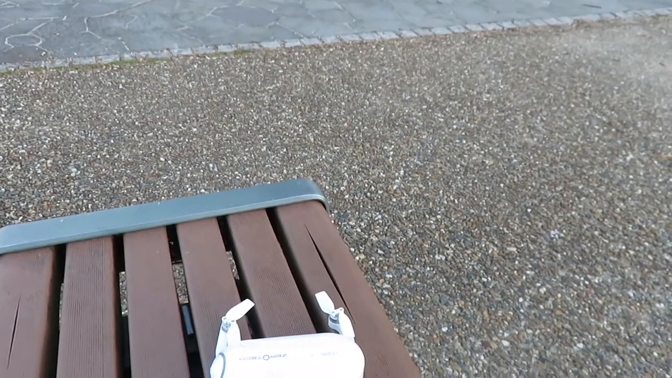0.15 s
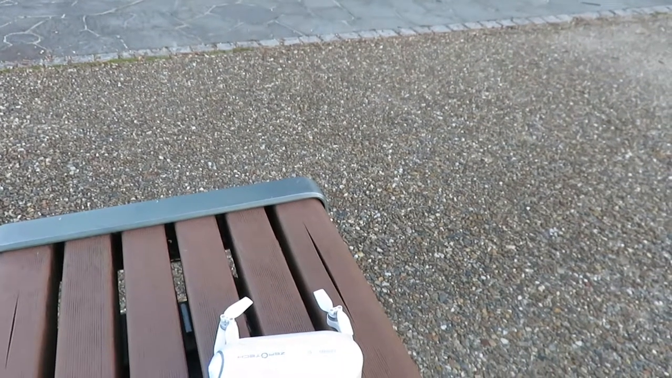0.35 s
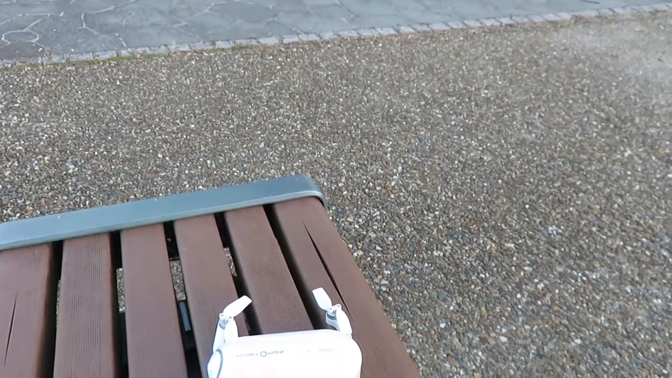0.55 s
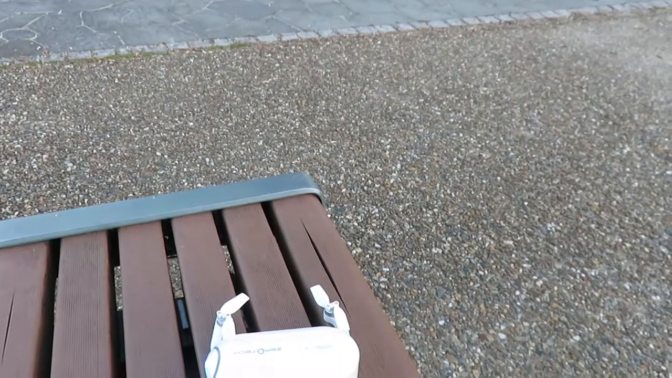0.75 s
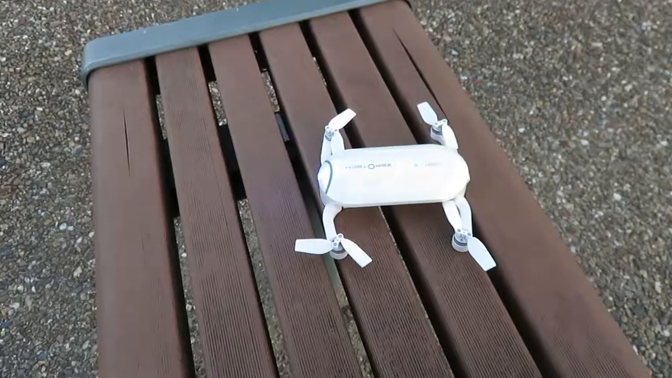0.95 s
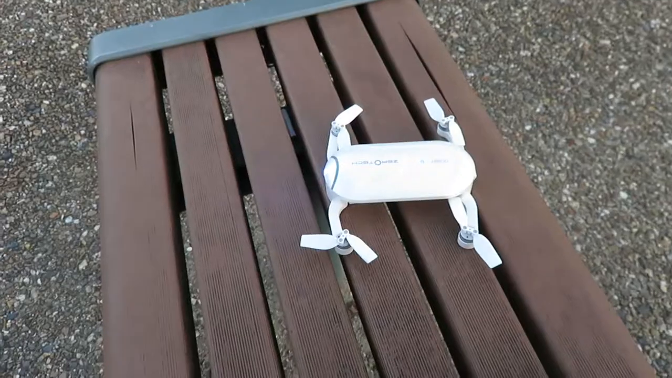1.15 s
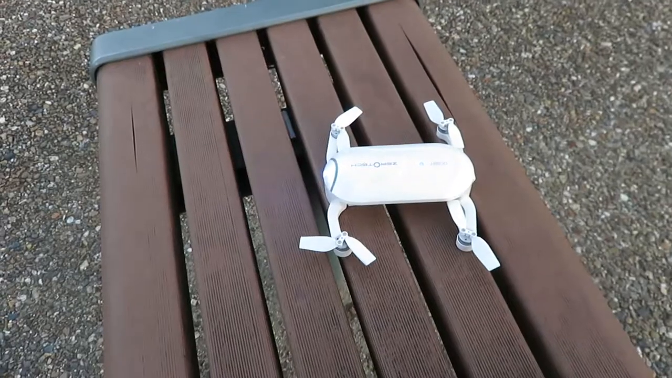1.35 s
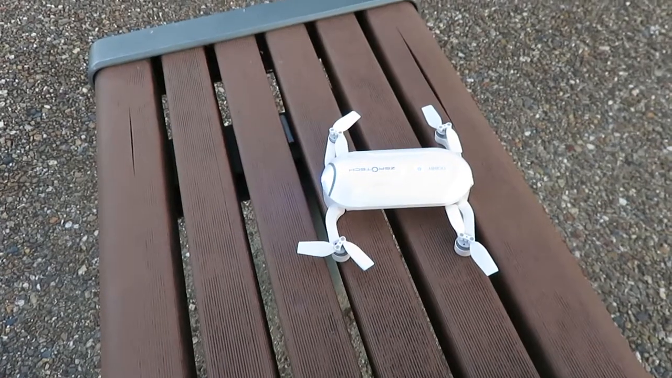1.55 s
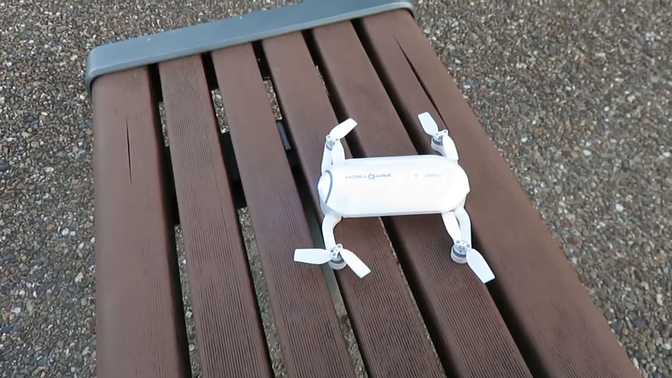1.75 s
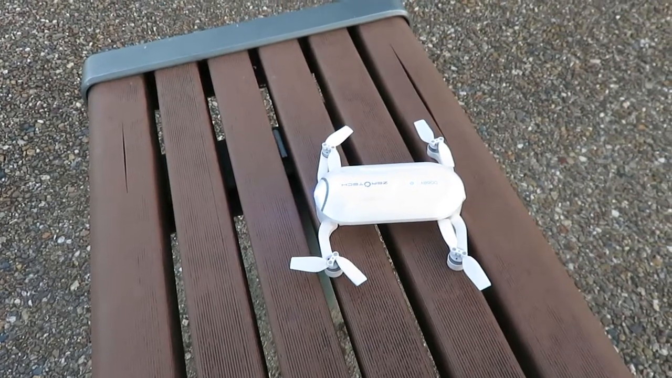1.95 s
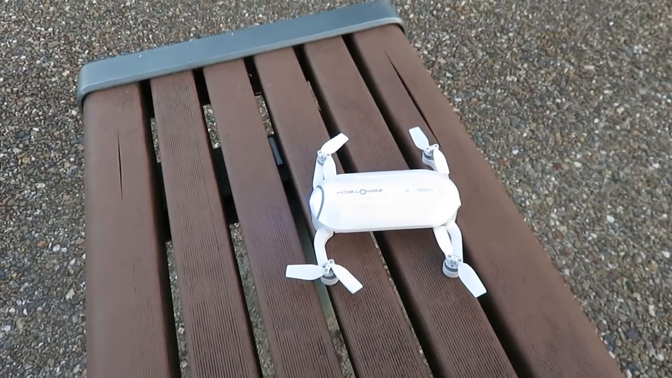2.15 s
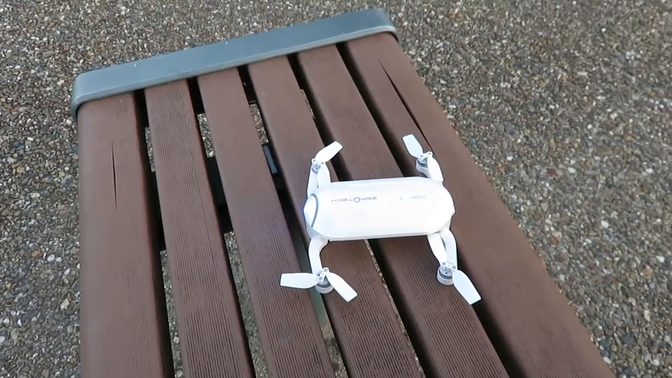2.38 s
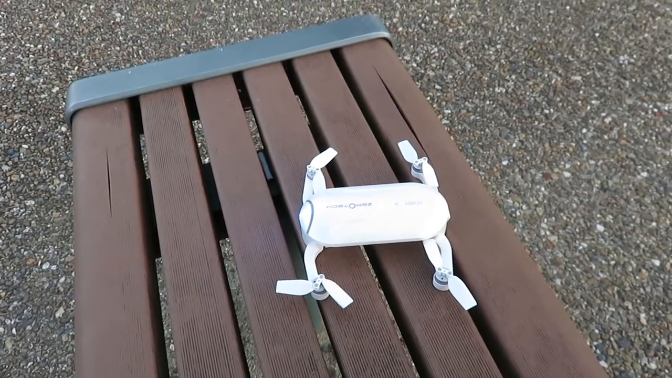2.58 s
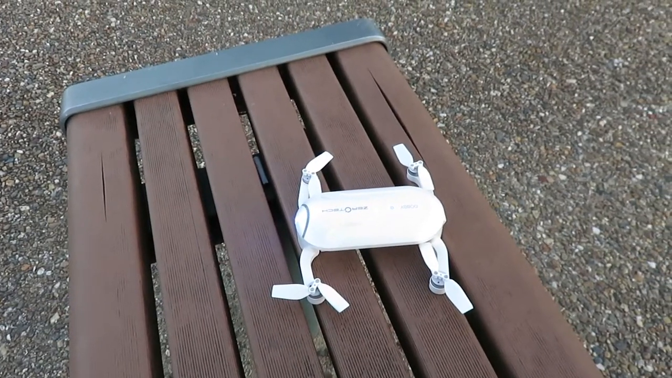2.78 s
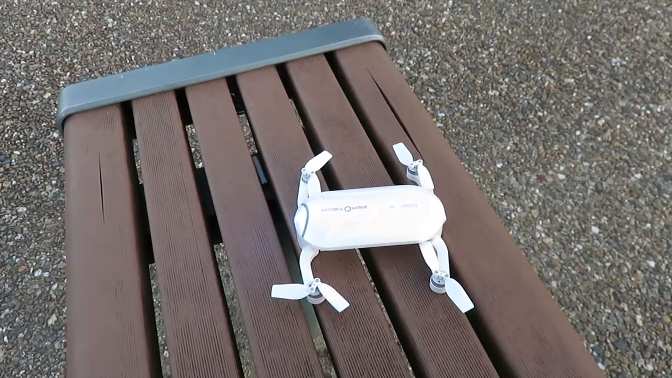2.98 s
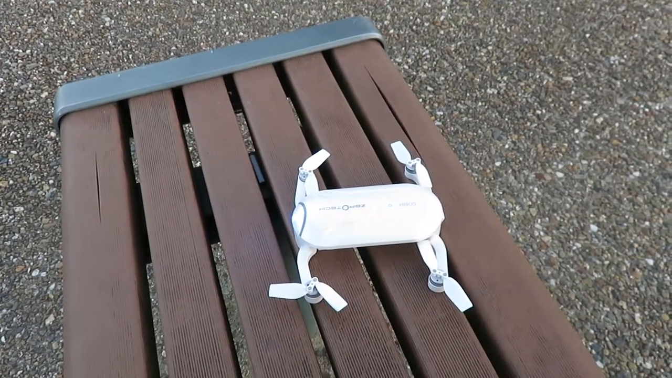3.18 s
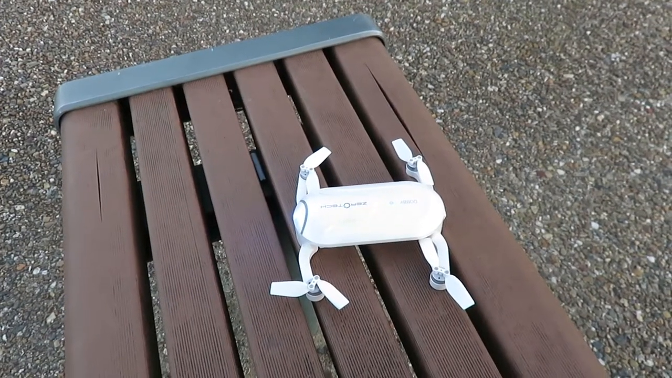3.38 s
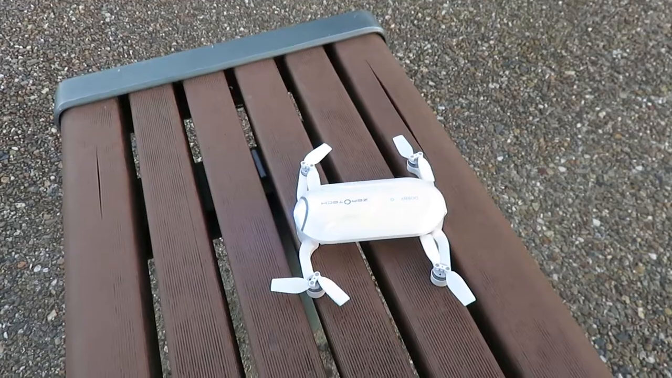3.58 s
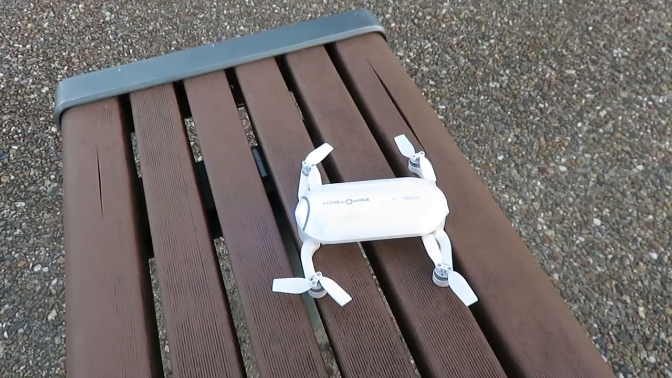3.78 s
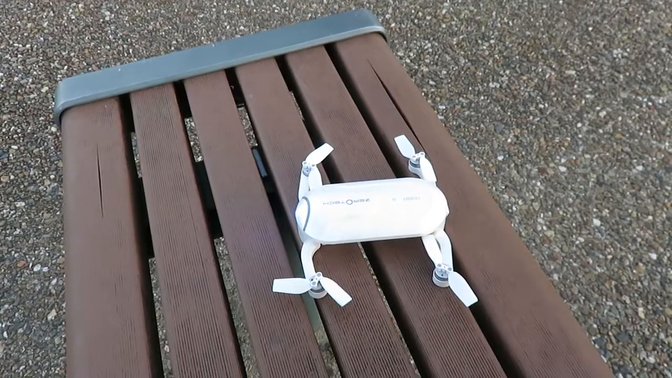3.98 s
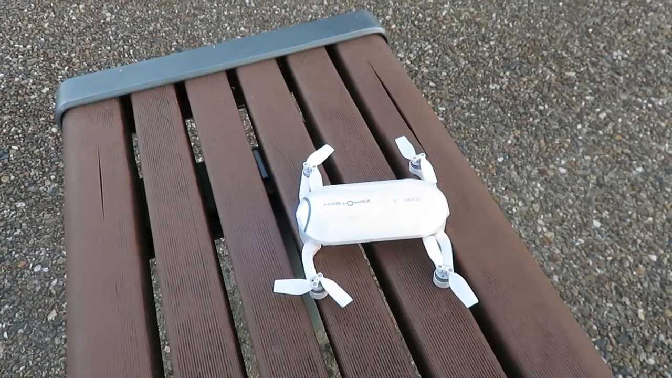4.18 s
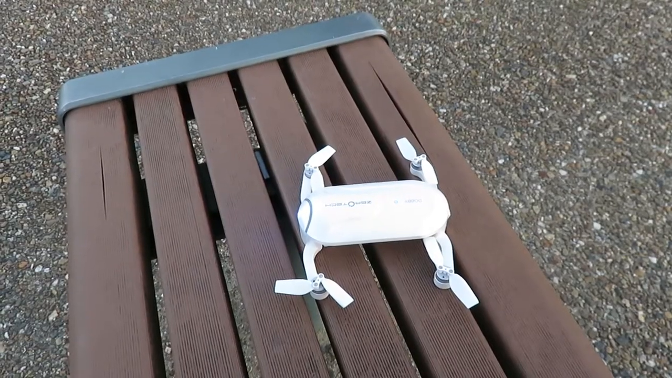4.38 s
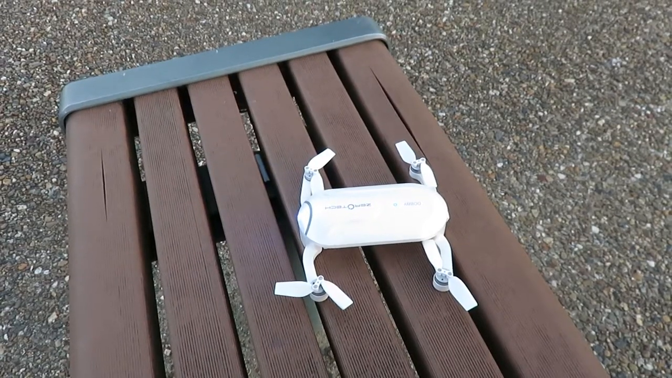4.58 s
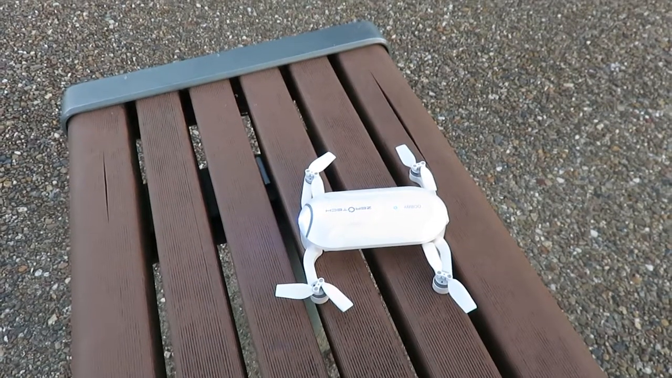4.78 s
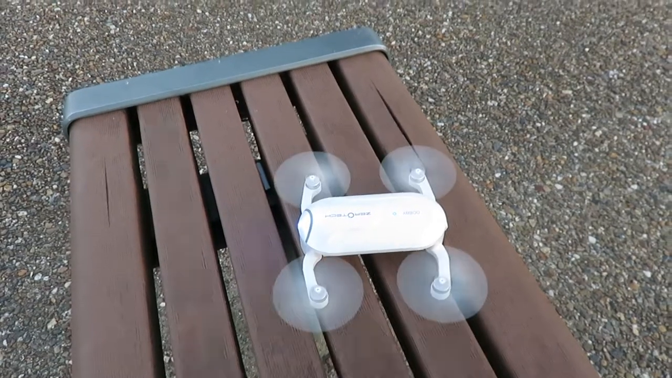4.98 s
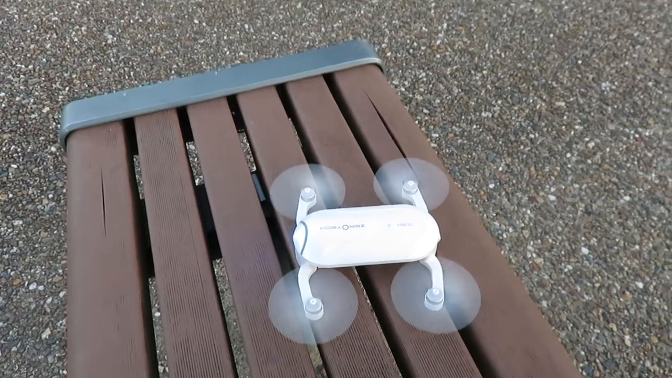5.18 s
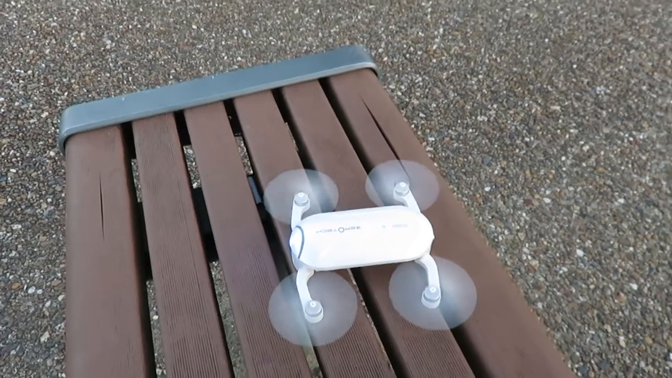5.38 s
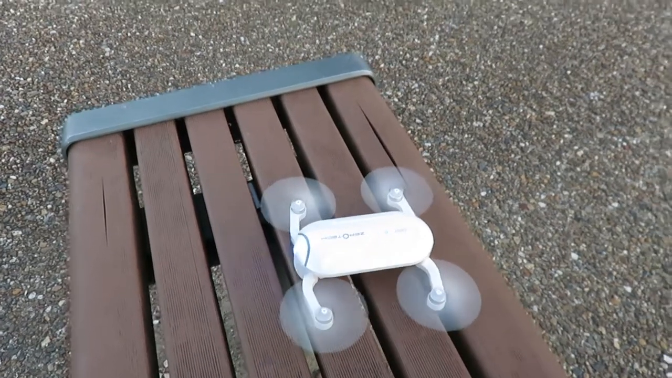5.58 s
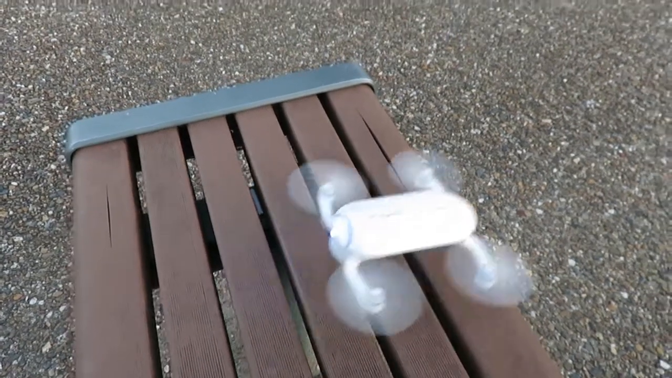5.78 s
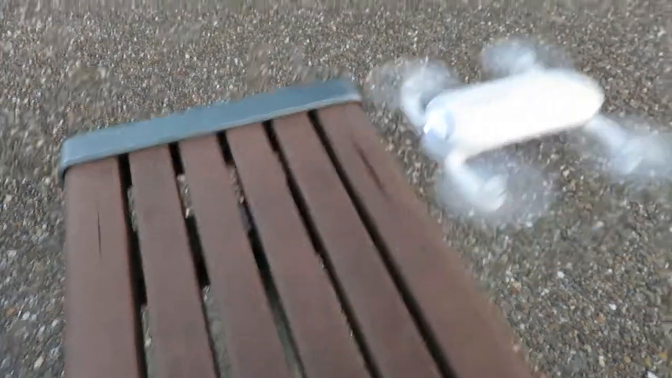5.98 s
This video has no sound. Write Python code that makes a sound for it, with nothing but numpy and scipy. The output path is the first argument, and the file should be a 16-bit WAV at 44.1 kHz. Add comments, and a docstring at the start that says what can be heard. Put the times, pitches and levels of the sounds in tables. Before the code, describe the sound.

Quiet outdoor rumble with a faint whine and distant idling engine, then folded blades clack open and small drone rotors surge into a loud buzz.

```python
"""A low distant rumble, open air, an idling engine and the faint whine of a small waiting quadcopter; then
chirps, a puff of wind and light knocks. A faint tap, hinged blades clack open, and four rotors kick and run up.
Rumble, air and engine are shaped noise, the whine and chirps are sines, struck parts are decaying modes. Each
two-bladed rotor is a series of shaft harmonics whose passing blades chop a rush of noise; buzz and rush level
off as the drone lifts away to the right."""
import sys
import numpy as np
from scipy import signal
from scipy.fft import rfft, irfft, next_fast_len
from scipy.io import wavfile
from scipy.ndimage import uniform_filter1d

SR = 44100
rng = np.random.default_rng(int(sys.argv[2]) if len(sys.argv) > 2 else 0)


def waveform_to_disk(signal):
    """Save audio, clipped to [-1, 1], as 16-bit WAV at the path in sys.argv[1]."""
    frames = np.transpose(np.atleast_2d(signal))
    scaled = np.clip(frames, -1, 1) * 32767
    samples = np.round(scaled).astype(np.int16)
    wavfile.write(sys.argv[1], SR, samples)


N = 266364
TIME = np.arange(N) / SR
FFT_SIZE = next_fast_len(N)


def from_db(db):
    """Level law: twenty decibels are a factor of ten in amplitude."""
    return 10 ** (np.asarray(db) / 20)


def rms_one(x):
    """Normalization: scale to an rms of 1."""
    return x / np.sqrt(np.mean(x ** 2) + 1e-20)


def at_hz(points, hz):
    """Spectral envelope: interpolate linearly over log frequency."""
    point_hz, value = np.transpose(points)
    return np.interp(np.log(hz + 1e-3), np.log(point_hz), value)


def ramp(start, length, t=TIME):
    """Linear transition: rise evenly from 0 to 1, then stay."""
    return np.clip((t - start) / length, 0, 1)


def swell(start, length, edge):
    """Trapezoidal envelope: rise to 1, hold, fall back to 0."""
    return ramp(start, edge) - ramp(start + length - edge, edge)


def drift(rate_hz, size=N):
    """Slow random modulation: white noise through two equal lowpass poles at rate_hz, scaled to rms 1."""
    step = 40  # samples between the computed points
    pole = np.exp(-2 * np.pi * step * rate_hz / SR)
    white = rng.standard_normal(size // step + 2002)
    slow = signal.lfilter([1], [1, -2 * pole, pole * pole], white)[2000:]  # skip the filter's onset
    return np.interp(np.arange(size) / step, np.arange(len(slow)), rms_one(slow))


def noise(spectrum, width):
    """Filtered mid-side noise: the middle has rms 1, and steep skirts close off the spectrum."""
    hz = np.arange(FFT_SIZE // 2 + 1) * SR / FFT_SIZE
    high_skirt = 1 / (1 + (hz / spectrum[-1][0]) ** 8)
    low_skirt = 1 / (1 + (spectrum[0][0] / (hz + 1)) ** 4)
    shape = from_db(at_hz(spectrum, hz)) * high_skirt * low_skirt
    mid_bins, side_bins = rfft(rng.standard_normal((2, FFT_SIZE))) * shape
    side_bins = side_bins * from_db(at_hz(width, hz))
    mid, side = irfft(np.array([mid_bins, side_bins]), FFT_SIZE)[:, :N]
    return np.array([mid + side, mid - side]) / np.std(mid)


def tone(hz):
    """Frequency modulation: integrate a pitch curve into the phase of a sine of rms 1."""
    return np.sqrt(2) * np.sin(2 * np.pi * (np.cumsum(hz, axis=-1) / SR + rng.random()))


def bursts(times, levels_db, t60):
    """Exponential decay: jump at each time and fall 60 dB in t60 seconds."""
    clicks = np.zeros(N)
    clicks[np.round(np.asarray(times) * SR).astype(int)] = from_db(levels_db)
    return signal.lfilter([1], [1, -from_db(-60 / (t60 * SR))], clicks + 1e-18)


def ring(clicks, hz, t60):
    """Damped resonance: a two-pole filter that a unit click sets ringing as a decaying sine."""
    radius, angle = from_db(-60 / (t60 * SR)), 2 * np.pi * hz / SR
    poles = [1, -2 * radius * np.cos(angle), radius * radius]
    return signal.lfilter([0, np.sin(angle)], poles, clicks + 1e-18)


def strike(times, levels_db, modes):
    """Modal excitation: every blow rings every mode, with a random polarity."""
    at, out = np.round(times * SR).astype(int), np.zeros(N)
    for hz, mode_db, t60 in modes:
        clicks = np.zeros(N)
        clicks[at] = from_db(levels_db + mode_db) * rng.choice([-1, 1], len(at))
        out += ring(clicks, hz, t60)
    return out


# distant rumble and open air: frequency_hz, relative_db
RUMBLE_SPECTRUM = [(12, -38), (20, -12), (49, -0.5), (103, 1), (274, -6), (347, -12.5), (450, -24),
                   (580, -68), (990, -120)]
AIR_SPECTRUM = [(220, -25), (380, -2), (522, -5), (705, -0.5), (772, -3), (940, -1.5), (1200, -7),
                (1460, -3.5), (1740, -6.5), (2660, -12.5), (3550, -25), (4380, -23.5), (5410, -26),
                (12400, -35.5), (14000, -36)]
# puff of wind: frequency_hz, relative_db
PUFF_SPECTRUM = [(20, -1), (50, 2), (110, -11), (250, -19)]
# stereo width of the surroundings: frequency_hz, side_over_mid_db
PARK_WIDTH = [(60, -39), (120, -31), (200, -18.5), (450, -3), (700, -9.5), (2400, -9), (3300, 2),
              (13000, 2.5)]
RUMBLE_DB, AIR_DB = -41.4, -49.5
KICK_S, LIFT_OFF_S, LEVEL_OFF_S = 5.02, 5.68, 5.93  # stages of the flight
PARK_SINK_DB = 6.5  # rumble and air sink by this much between kick and lift-off
PUFF_START_S, PUFF_LENGTH_S, PUFF_EDGE_S, PUFF_DB = .9, .26, .04, -41


def park(air_sway_db=.5):
    """Broadband ambience: stationary rumble and gently swaying air, with one low-frequency puff of wind."""
    rumble = from_db(RUMBLE_DB) * noise(RUMBLE_SPECTRUM, PARK_WIDTH)
    air = from_db(AIR_DB + air_sway_db * drift(1.0)) * noise(AIR_SPECTRUM, PARK_WIDTH)
    sink = from_db(-PARK_SINK_DB * ramp(KICK_S, LIFT_OFF_S - KICK_S))
    puff = swell(PUFF_START_S, PUFF_LENGTH_S, PUFF_EDGE_S) * noise(PUFF_SPECTRUM, [(20, -22), (250, -7)])
    return (rumble + air) * sink + from_db(PUFF_DB) * puff


# clatter of the idling engine: frequency_hz, relative_db
CLATTER_SPECTRUM = [(500, -7), (1000, -3.5), (2000, 4), (2900, -0.5), (3400, -11), (6000, -22)]
FIRST_FIRING_S, FIRING_HZ = .016, 31.05
DROPOUT_START_S, DROPOUT_END_S = .897, .918
ENGINE_EARLY_DB, ENGINE_DB = -59, -47.5  # mean burst level until and after the dropout ends


def far_engine(knock_t60=0.023, uneven_db=1.0):
    """Periodic excitation: each firing gives a decaying noise burst, its treble lost over distance."""
    firings = np.arange(FIRST_FIRING_S, TIME[-1], 1 / FIRING_HZ)
    levels_db = np.where(firings > DROPOUT_END_S, ENGINE_DB, ENGINE_EARLY_DB)
    levels_db = levels_db + rng.normal(0, uneven_db, len(firings))
    clatter = bursts(firings, levels_db, knock_t60) * noise(CLATTER_SPECTRUM, PARK_WIDTH)
    distance = signal.butter(4, 3300, fs=SR, output="sos")
    return signal.sosfilt(distance, clatter)


# overtones of the idle whine: mean pitch_hz, level_db (rms before flutter)
WHINE_OVERTONES = [(1416, -61.5), (2595, -65), (4242, -76.5), (4479, -80.5), (5658, -86)]
# swells of the lowest note: start_s, length_s, rise_db
WHINE_SWELLS = [(1.40, 0.45, 13.5), (2.52, 0.28, 9), (2.96, 0.21, 12.5), (3.84, .16, 8)]
HUM_HZ, HUM_DB, HUM_SWELL_S = 710, -67.5, 0.044  # mean pitch, resting level, rise and fall of a swell


def idle_whine(hum_flutter_db=2.5, waver=0.00371, flutter_db=2.0):
    """Common frequency modulation: one wavering speed moves the low note and its thin overtones together."""
    speed = 1 + waver * drift(23.7) + 0.001042 * drift(1.44)
    swells_db = sum(rise_db * swell(start, length, HUM_SWELL_S) for start, length, rise_db in WHINE_SWELLS)
    whine = from_db(HUM_DB + swells_db + hum_flutter_db * drift(4.8)) * tone(HUM_HZ * speed)
    for hz, level_db in WHINE_OVERTONES:
        whine += from_db(level_db + flutter_db * drift(6.8)) * tone(hz * speed)
    return whine


# thin bird chirps: start_s, length_s, start pitch_hz, end pitch_hz, relative level_db
CHIRPS = [(.62, 0.21, 10500, 10600, -70.5), (.73, .04, 4900, 4600, -71), (.74, 0.17, 12600, 11900, -73),
          (.76, .14, 11400, 10700, -73), (.76, .14, 14400, 13900, -77), (.815, 0.038, 4900, 4300, -70),
          (1.838, .3, 10800, 10800, -72), (1.9, 0.12, 12200, 11900, -74), (2.1, .12, 11200, 10000, -75),
          (3.018, 0.068, 4600, 4800, -68), (3.9, .09, 4480, 4880, -69)]


def birds(waver=.02, level_db=-1.5, rough_db=3.5):
    """Gliding sines: each distant chirp sweeps its pitch under a half-sine envelope, shaken at random."""
    out = np.zeros(N)
    unsteady, flicker_db = 1 + waver * drift(70), rough_db * drift(60)
    for start, length, from_hz, to_hz, chirp_db in CHIRPS:
        on = (TIME > start) & (TIME < start + length)
        along = (TIME[on] - start) / length
        pitch = (from_hz + (to_hz - from_hz) * along) * unsteady[on]
        gain = from_db(chirp_db + level_db + flicker_db[on])
        out[on] += gain * np.sin(np.pi * along) * tone(pitch)
    return out


# faint handling knocks: start_s, relative level_db
HANDLING_KNOCKS = [(0.953, -45), (1.017, -43), (1.262, -31)]
# their ringing: pitch_hz, relative level_db, t60_s
KNOCK_MODES = [(1090, -6.5, 0.047), (2276, -4, 0.029), (2880, -17, 0.018)]
# their dry click: frequency_hz, relative_db
KNOCK_SPECTRUM = [(700, -6), (1200, 0), (2500, -2), (3500, -16), (7000, -28)]
# stereo width of the drone: frequency_hz, side_over_mid_db
DRONE_WIDTH = [(100, -35), (400, -29), (700, -38), (1300, -57), (2400, -34), (3500, -34), (4600, -16),
               (8000, -8), (13000, -4.5)]


def knocks(ring_db=-3, click_db=-10, click_t60=.03):
    """Impact: each handling knock gives a dry noise click and a short modal ring."""
    times, levels_db = np.transpose(HANDLING_KNOCKS)
    click = bursts(times, levels_db + click_db, click_t60) * noise(KNOCK_SPECTRUM, DRONE_WIDTH)
    return click + strike(times, levels_db + ring_db, KNOCK_MODES)


# a faint first tap as the blades start swinging, then blades hitting their hinge stops: start_s, relative ring
# # level_db, relative crack level_db
HINGE_SOUNDS = [(4.985, -36, -27), (4.9924, -19.5, -23), (5.0031, -11.5, -6), (5.0068, -9, -18),
                (5.0123, -8, -17), (5.0200, -5.5, -17)]
# resonances of blades and arms: pitch_hz, relative level_db, t60_s
BLADE_RESONANCES = [(570, -16.5, 0.039), (834, -12.5, 0.073), (1050, -5.5, .02), (1280, -11, 0.032),
                    (1383, -3, 0.048), (1500, -2.5, 0.027), (1830, -16, 0.013), (2350, -8, 0.022),
                    (2740, -13, 0.018), (3740, -20, .02), (4470, -16, 0.025), (5360, -21, 0.019),
                    (6300, -15, 0.027)]
# crack against the stop: frequency_hz, relative_db
CRACK_SPECTRUM = [(180, -51), (300, -40), (1430, -2), (1800, -9), (2630, -5), (3270, -12), (3990, -18),
                  (5380, -6.5), (6780, -20), (10800, -12.5), (11500, -14), (14300, -14), (15800, -30)]


def unfolding(ring_db=-5.0, crack_db=-3, crack_t60=0.029, snap_db=-5, snap_t60=.005, tail_db=-30, tail_t60=0.12):
    """Impact and resonance: a bright snap, a crack, ringing plastic and a faint outdoor tail."""
    times, rings_db, cracks_db = np.transpose(HINGE_SOUNDS)
    snap_noise = noise([(2500, -5), (6000, 0), (15000, 0)], DRONE_WIDTH)
    snap = bursts(times, cracks_db + snap_db, snap_t60) * snap_noise
    crack = bursts(times, cracks_db + crack_db, crack_t60)
    tail = bursts(times, cracks_db + tail_db, tail_t60)
    ringing = strike(times, rings_db + ring_db, BLADE_RESONANCES)
    return ringing + snap + (crack + tail) * noise(CRACK_SPECTRUM, DRONE_WIDTH)


# throttle pushes in the air: rotor number, start_s, length_s, rise_hz (before easing)
THROTTLE_PUSHES = [(1, 5.755, .175, 154), (2, 5.68, .11, 120), (2, 5.82, .11, 74), (3, 5.68, .11, 114),
                   (3, 5.82, .11, 66), (4, 5.68, .17, 112), (4, 5.85, .065, 100)]
# the four rotors: blade-pass pitch_hz at the kick (before motor lag), run-up_hz_per_s, relative level_db,
# change aloft_db, blade imbalance_db
ROTOR_SETTINGS = [(271.9, 504, 1.5, -8.5, -15.5), (265.2, 435, -1, -2.5, -11.5), (200.3, 437, 0, -5, -18),
                  (182, 445, -2, -2, -20)]
SPIN_UP_S = .022  # lag of the motors behind the throttle
EASE_SHARE, EASE_S = .032, .035  # levelling off: share of speed lost, and its lag


def rotor_speeds(t):
    """First-order motor lag: a kick, an even run-up to lift-off, separate pushes and a slight easing."""
    caught_up = 1 - np.exp(-(t - KICK_S) / SPIN_UP_S)
    eased = 1 - EASE_SHARE * (1 - np.exp(-np.maximum(t - LEVEL_OFF_S, 0) / EASE_S))
    run_up_s = np.minimum(t, LIFT_OFF_S) - KICK_S
    speeds = np.array([start_hz + hz_per_s * run_up_s for start_hz, hz_per_s, *_ in ROTOR_SETTINGS])
    for number, start, length, rise_hz in THROTTLE_PUSHES:
        speeds[round(number) - 1] += rise_hz * ramp(start, length, t)
    return speeds * caught_up * eased


# how well the drone radiates its buzz: frequency_hz, relative_db
BUZZ_RADIATION = [(150, -6), (300, -1.5), (450, -6.5), (600, -4), (740, -7), (880, -2), (1320, 0),
                  (1600, -5), (1850, -.5), (2250, 1.5), (2700, 1), (3400, -7.5), (5400, 0), (8000, -10),
                  (14000, -13)]


def rotor(blade_hz, harmonics, imbalance_db, flutter_db, flutter_rate, jitter, wander=0.27, count=28):
    """Fourier series of a turning rotor, and its blade angle; odd shaft orders come from unequal blades."""
    size = len(blade_hz)
    blade_hz = blade_hz * (1 + jitter * drift(52.5, size))
    shaft = np.pi * np.cumsum(blade_hz) / SR  # two blades: half the blade-pass rate
    out = np.zeros((2, size))
    for order in range(1, count + 1):
        hz = order * blade_hz / 2
        # turbulent inflow shakes level and phase, the blade-pass tone least
        shaken = .4 if order == 2 else 1
        flutter = shaken * flutter_db * drift(flutter_rate, size)
        level_db = at_hz(harmonics, order / 2) + at_hz(BUZZ_RADIATION, hz)
        gain = from_db(level_db + imbalance_db * (order % 2) + flutter)
        phase = order * shaft + 2 * np.pi * rng.random() + shaken * wander * drift(46, size)
        side = from_db(at_hz(DRONE_WIDTH, hz)) * np.cos(phase) * rng.choice([-1, 1])
        out += np.sqrt(2) * gain * (np.sin(phase) + np.array([side, -side]))
    return out, 2 * shaft


# blade harmonics: multiple of the blade-pass rate, relative level_db of rotors 1, 2, 3 and 4
BLADE_HARMONICS = [(1, -25, -25.5, -28.5, -34), (2, -30.5, -33, -31, -34), (3, -31.5, -34.5, -27, -33),
                   (4, -30, -40, -31, -31.5), (5, -33, -38, -30.5, -42), (6, -33.5, -48, -39, -50),
                   (9, -39.5, -40.5, -42, -45), (20, -42, -49, -43, -45)]
# colour of the rush, in three bands: frequency_hz, relative_db
MIDDLE_SPECTRUM = [(90, -14), (200, -2), (450, -11.5), (800, -5.5), (1400, -1), (2000, -2.5), (2800, 2),
                   (3400, -7.5), (4500, -30.5)]
TREBLE_SPECTRUM = [(1880, -29), (3200, -19), (3580, -5), (5350, 1), (5920, 0), (6850, -5.5), (9000, -13),
                   (11700, -36), (19800, -120)]
TOP_SPECTRUM = [(5180, -16), (8800, -2), (10300, -4), (11600, 1), (12400, 2), (13500, -1), (15800, -9)]
# middle, treble and top: level_db at the reference rate, growth_db per decade of speed,
# loss_db clear of the bench
RUSH_BANDS = [(-17.5, 61, 15), (-16.5, 64.5, 15.5), (-24, 61, 9)]
REFERENCE_HZ, BUZZ_DB_PER_DECADE = 500, 42.5  # buzz grows with blade-pass rate
TILT_S, FLOW_BUILD_S = 0.22, 0.081  # time to the flying attitude; time for the airflow to build up
UNLOAD_S, UNLOAD_LENGTH_S = 5.446, .37  # the downwash beats less and less on the slats
AWAY_DB_PER_S = 24  # fading after levelling off, as the drone drifts away
VEER_S, VEER_DB_PER_S = 5.81, 2.5  # veering right: the right side gains, the left loses


def propellers(chop=0.34):
    """Blade-pass tones and amplitude-modulated flow noise: four rotors chop the air, louder with speed."""
    running = TIME > KICK_S
    t = TIME[running]
    speeds, aloft = rotor_speeds(t), ramp(LIFT_OFF_S, TILT_S, t)
    buzz, chop_power, rush = np.zeros((2, N)), np.zeros(N), np.zeros((2, N))
    multiples, *timbres = np.transpose(BLADE_HARMONICS)
    for blade_hz, settings, timbre in zip(speeds, ROTOR_SETTINGS, timbres):
        _, _, level_db, aloft_db, imbalance_db = settings
        growth_db = BUZZ_DB_PER_DECADE * np.log10(blade_hz / REFERENCE_HZ)
        thrust = from_db(level_db + growth_db + aloft_db * aloft)
        lines, angle = rotor(blade_hz, list(zip(multiples, timbre)), imbalance_db,
                             flutter_db=2.5, flutter_rate=12.6, jitter=.0025)
        buzz[:, running] += thrust * lines
        # one puff per blade, one blade stronger than the other
        blade_puffs = np.exp(2 * chop * (np.cos(angle) + 0.24 * np.cos(angle / 2)))
        chop_power[running] += thrust ** 2 * blade_puffs
    # dividing by the running mean power leaves only the fast pulsing
    mean_power = np.abs(uniform_filter1d(chop_power, size=1500))
    pulsing = np.sqrt(chop_power / (mean_power + 1e-9))
    decades = np.log10(speeds.mean(axis=0) / REFERENCE_HZ)
    clear = ramp(UNLOAD_S, UNLOAD_LENGTH_S, t)
    spectra = (MIDDLE_SPECTRUM, TREBLE_SPECTRUM, TOP_SPECTRUM)
    for (level_db, growth_db, loss_db), spectrum in zip(RUSH_BANDS, spectra):
        gain = from_db(level_db + growth_db * decades - loss_db * clear)
        rush[:, running] += gain * noise(spectrum, DRONE_WIDTH)[:, running]
    away_db = -AWAY_DB_PER_S * np.maximum(TIME - LEVEL_OFF_S, 0)
    pan_db = VEER_DB_PER_S * np.maximum(TIME - VEER_S, 0) * np.array([[-1], [1]])
    return (buzz + pulsing * rush) * ramp(KICK_S, FLOW_BUILD_S) * from_db(away_db + pan_db)


def scene():
    """Superposition: the park all around and the drone close by add linearly."""
    return park() + far_engine() + idle_whine() + birds() + knocks() + unfolding() + propellers()


CUTOFF_HZ = 15700


def record(dry):
    """Gating, clipping and band-limiting: a brief silence, flattened peaks and a steep lowpass."""
    live = (TIME < DROPOUT_START_S) | (TIME > DROPOUT_END_S)
    clipped = np.clip(dry * live, -.9, .9)
    lowpass = signal.ellip(12, .1, 90, CUTOFF_HZ, fs=SR, output="sos")
    return signal.sosfilt(lowpass, clipped)


dry = scene()
out = record(dry)
waveform_to_disk(out)
```